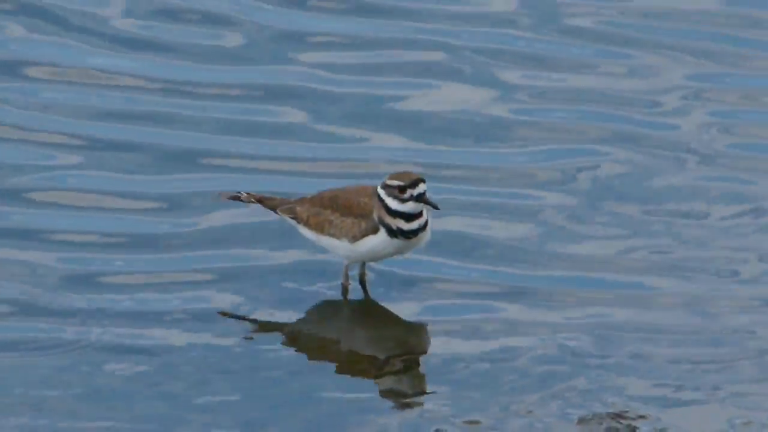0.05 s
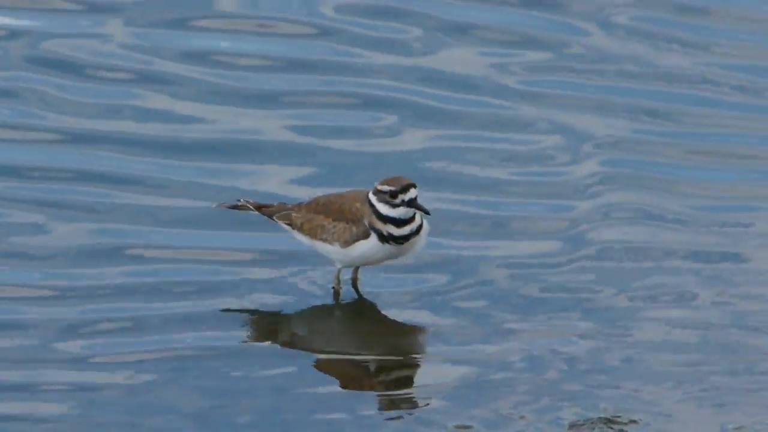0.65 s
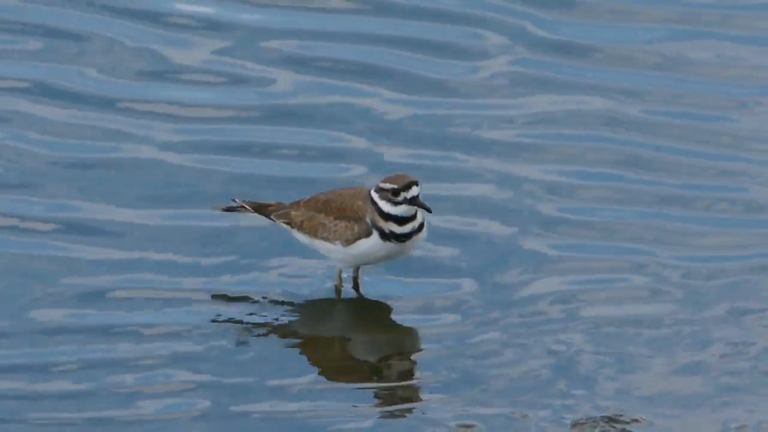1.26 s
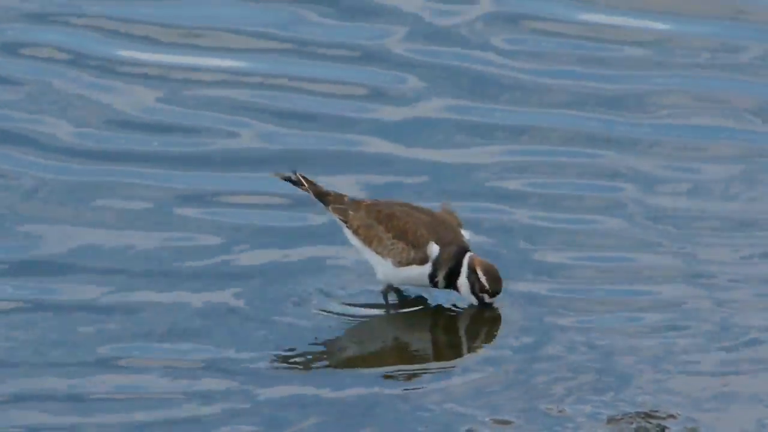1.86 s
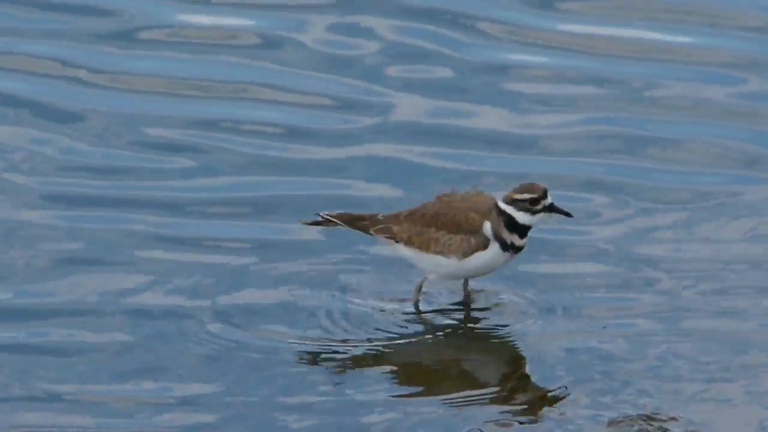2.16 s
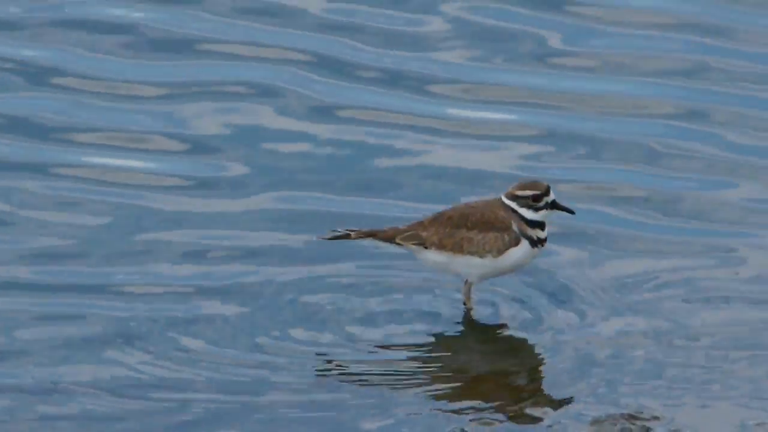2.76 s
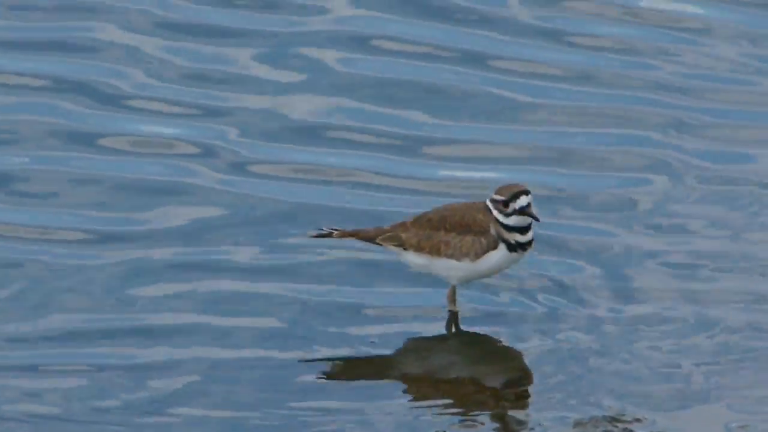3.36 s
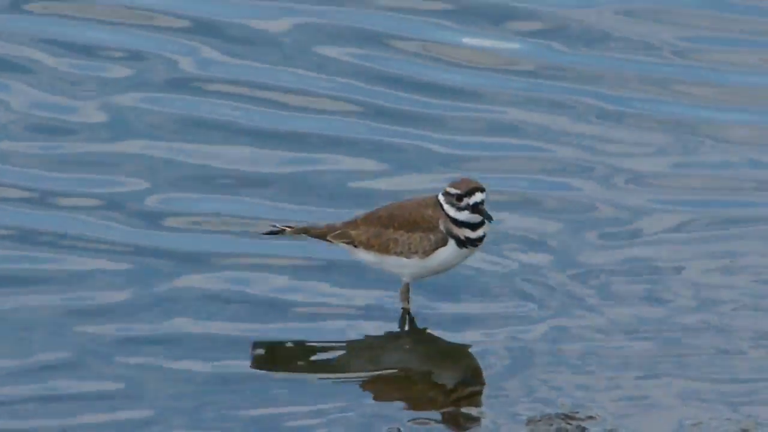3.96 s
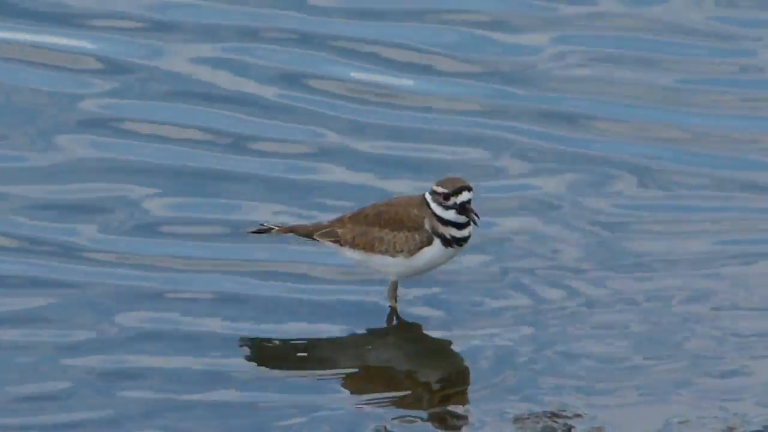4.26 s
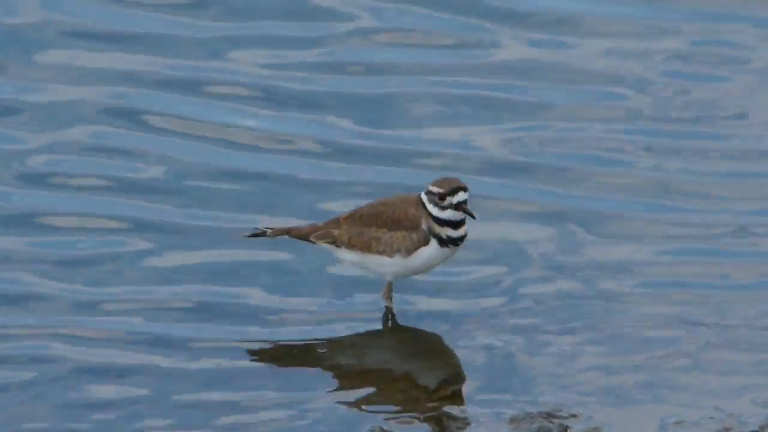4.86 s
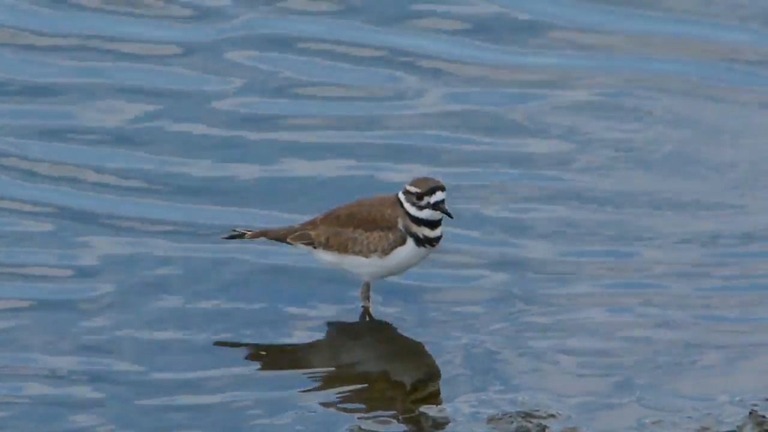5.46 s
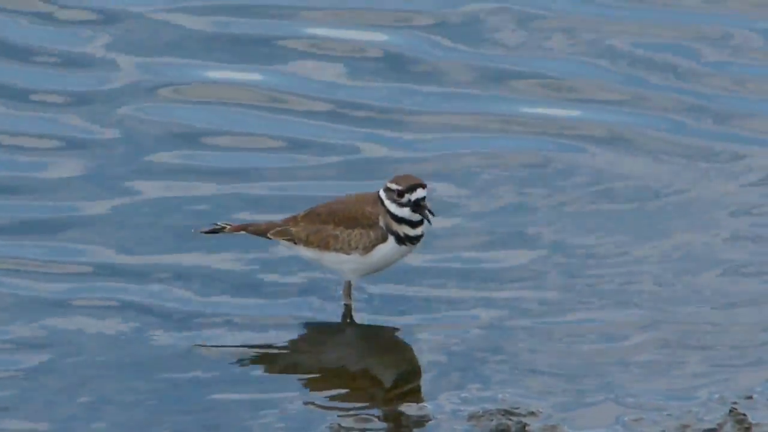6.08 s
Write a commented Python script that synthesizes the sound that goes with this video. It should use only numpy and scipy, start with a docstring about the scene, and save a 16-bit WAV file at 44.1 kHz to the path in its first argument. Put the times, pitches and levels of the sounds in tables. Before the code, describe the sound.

Distant shorebirds chirp, yelp and whistle, mostly from the right, over the quiet wash of shallow water and uneven wind on the microphone. The breeze drops briefly, then returns in harder gusts with low thumps and a few cracks. In the second half, a close shorebird sounds two piercing, slightly rising whistles, the second right at the end. The banks echo the birds faintly.

```python
"""Wind buffets the microphone over the steady wash of an open shore, while shorebirds chip and yelp
and a killdeer whistles far off to the right. After four seconds a near killdeer, standing in shallow
water, gives two loud, drawn-out whistles. Its throat lifts one overtone into the whistle, which turns
hoarse when strained. The banks echo the birds. Gusts hit the microphone's openings (its ports),
and the hardest swirls of air (eddies) thump and crack."""
import sys
import numpy as np
from scipy import signal
from scipy.fft import rfft, irfft, next_fast_len
from scipy.io import wavfile
from scipy.ndimage import uniform_filter1d, minimum_filter1d, map_coordinates

SR = 44100
rng = np.random.default_rng(int(sys.argv[2]) if len(sys.argv) > 2 else 0)


def unload_wav(signal):
    """Save mono or channel-first audio to the path in sys.argv[1] as 16-bit WAV at rate SR, clipped to [-1, 1]."""
    wavfile.write(
        sys.argv[1],
        SR,
        np.round(np.clip(np.atleast_2d(signal).T, -1, 1) * 32767).astype(np.int16),
    )


N = 274302


def amp(db):
    """Turn decibels into a gain."""
    return 10 ** (np.asarray(db) / 20)


def unit(x):
    """Scale x to an average (rms) level of 1."""
    return x / np.sqrt(np.mean(x ** 2) + 1e-20)


def along(points, hz):
    """Read (freq_hz, value) rows at hz, on a log frequency scale."""
    freqs, values = np.transpose(points)
    return np.interp(np.log(hz + 1), np.log(freqs + 1), values)


def bump(t, centre, width):
    """A bell curve of height 1."""
    return np.exp(-((t - centre) / width) ** 2)


def wobble(rate, size=N):
    """A smooth curve through `rate` random values a second."""
    return map_coordinates(rng.standard_normal(int(size * rate / SR) + 4), [np.arange(size) * rate / SR])


def filtered(x, response):
    """Multiply each frequency in x by response(hz)."""
    size = x.shape[-1]
    padded = next_fast_len(size + 4096)
    return irfft(rfft(x, padded) * response(np.fft.rfftfreq(padded, 1 / SR)), padded)[..., :size]


def noise(spectrum, size=N):
    """Two unrelated noises shaped by (freq_hz, gain_db) rows."""
    return unit(filtered(rng.standard_normal((2, size)), lambda hz: amp(along(spectrum, hz))))


def stereo_noise(spectrum, alike):
    """Noise whose left and right are the same (likeness 1), unrelated (0) or opposite (-1)."""
    a, b = noise(spectrum)
    angle = lambda hz: np.arccos(np.clip(along(alike, hz), -1, 1)) / 2
    mid = filtered(a, lambda hz: np.cos(angle(hz)))
    side = filtered(b, lambda hz: np.sin(angle(hz)))
    return unit(np.array([mid + side, mid - side]))


def panned(pan_db):
    """Left and right gains; pan_db is left minus right, so below 0 is to the right."""
    gains = amp(np.array([pan_db, -pan_db]) / 2).reshape(2, -1)
    return gains / np.sqrt(np.mean(gains ** 2, axis=0))


def placed(x, pan_db, lag_ms):
    """Put a sound to one side; the left ear hears it lag_ms later."""
    delay_s = np.array([[lag_ms], [0]]) / 1000
    return panned(pan_db) * filtered(x, lambda hz: np.exp(-2j * np.pi * hz * delay_s))


def add(track, start_s, x):
    """Mix x into track from start_s on."""
    start = max(round(start_s * SR), 0)
    part = x[..., :N - start]
    track[..., start:start + part.shape[-1]] += part


def shore():
    """The steady wash of ripples and distant air, mostly from the right."""
    # tone of the wash: freq_hz, gain_db
    wash = [(25, -12), (50, -13), (100, -1), (180, 0.5), (400, -2.5), (600, -0.5), (950, -2.5),
            (1400, -8.5), (2000, -16.5), (3000, -22), (4800, -24.5), (8000, -32.5), (15500, -40)]
    # how well the ears agree: freq_hz, likeness
    alike = [(200, 0.17), (350, 0.51), (600, 1), (950, 0.9), (1600, 0.79), (3000, 0.31), (9000, 0.31)]
    return amp(-45.5) * placed(stereo_noise(wash, alike), pan_db=-4, lag_ms=0.089)


def wind_strength(rise_s=0.018, fall_s=0.033, sag_db_per_s=3):
    """The wind's level and pan in dB: each gust rises out of the breeze, sags and dies away."""
    # wind between the gusts: time_s, level_db
    breeze = [(0, -47), (.9, -44), (1.55, -49.5), (1.95, -63), (2.8, -59), (3.6, -41), (3.97, -44),
              (4.3, -35.5), (4.9, -38.5), (5.25, -42), (5.6, -36.5), (6.22, -35.5)]
    # gusts at the ports: start_s, length_s, level_db, pan_db
    gusts = [(0.153, .6, -39.5, 3), (1.15, .3, -39.5, -0.5), (1.63, .15, -42, -0.5), (2.483, .23, -48, -2),
             (2.896, 0.0294, -39.5, -1), (3.138, .28, -38, -4), (3.655, .13, -31.5, -6.5),
             (3.843, 0.041, -35.5, -7), (4.022, .16, -32.5, -5), (4.427, .04, -27, -8),
             (4.534, 0.0293, -29, -7.5), (4.626, .06, -26, -2), (4.726, .04, -31, -7.5),
             (4.963, .21, -33, -4.5), (5.306, .09, -29, -0.5), (5.433, .07, -34.5, -5), (5.75, .47, -32, 3)]
    t = np.arange(N) / SR
    power = amp(np.interp(t, *np.transpose(breeze))) ** 2
    side = np.zeros(N)
    for start, length, db, pan_db in gusts:
        edges = np.exp(-np.maximum(start - t, 0) / rise_s - np.maximum(t - start - length, 0) / fall_s)
        gust = (edges * amp(db - sag_db_per_s * np.clip(t - start, 0, length))) ** 2
        power += gust
        side += pan_db * gust
    return 10 * np.log10(power), side / power


def wind(gust_db, side_db, lump_limit_db=5.5):
    """Churning air hits the ports in lumps; stronger gusts break into smaller, brighter eddies."""
    # low rumble of the wind: freq_hz, gain_db
    buffet = [(25, -27), (50, -40), (100, -13.5), (160, -0.5), (240, 3.5), (400, -4), (600, -11),
              (1000, -29), (2000, -36), (5000, -94)]
    # its brighter flutter: freq_hz, gain_db
    flutter = [(100, -81), (250, 4), (400, 2.5), (600, -2.5), (1000, -15.5), (2000, -48.5), (5000, -49),
               (15000, -91)]
    # how well the ports agree: freq_hz, likeness
    alike = [(100, 0.67), (180, 0.3), (300, -0.21), (600, -0.63), (1200, -1.03), (3000, -0.14)]
    lumps_db = 2.82 * wobble(70) + 0.97 * np.array([wobble(110), wobble(110)])
    force_db = gust_db + np.minimum(lumps_db, lump_limit_db)
    low = amp(force_db + 1) * stereo_noise(buffet, alike) * panned(pan_db=-3)
    bright = amp(-35.5 + 1.57 * (force_db + 33.5)) * stereo_noise(flutter, alike) * panned(pan_db=2)
    return panned(side_db) * (low + bright)


def chance_eddies(gust_db, side_db, count, spread_db=1.5):
    """Rows for eddies(): the stronger the wind, the more often and the harder they strike."""
    odds = np.cumsum(amp(gust_db / 2))
    at = np.searchsorted(odds, (np.arange(count) + rng.random(count)) / count * odds[-1])
    size, stray_db = rng.standard_normal((count, 2)).T
    db = gust_db[at] + spread_db * size
    return np.transpose([at / SR, db + 6.5, db - 19, side_db[at] + stray_db])


def eddies(chance_rows, thump_hz=344, thump_s=0.0021, crack_s=0.0013, left_lag_cycles=0.34):
    """An eddy swings the air pressure a few times, out of step at the two ports, and cracks at its peak."""
    # the hardest eddies, levels relative: time_s, thump_db, crack_db, pan_db
    hardest = [(0.165, -24, -67, 8), (0.403, -20, -60, -2), (0.537, -19, -65, 0.5), (0.663, -20.5, -69, -3),
               (1.181, -21, -62, -4), (1.415, -22.5, -44, -9), (2.535, -27, -62, -4),
               (3.01, -26.5, -58, -3), (3.091, -18.5, -51, -10), (3.153, -22.5, -58, -9),
               (3.175, -14.5, -46, -9), (3.279, -19, -58, -2), (3.672, -13, -34.5, -7),
               (3.741, -13, -40.5, -4), (3.782, -16.5, -46, -6), (4.403, -13.5, -38, -9),
               (4.433, -9.5, -30.5, -7), (4.442, -15.5, -44, 10), (4.462, -7, -26.5, 2),
               (4.469, -10, -36.5, 2), (4.478, -6, -21, -3), (4.532, -6.5, -24, -5.5),
               (4.56, -4.5, -36, -5), (4.593, -14.5, -33.5, -3.5), (4.623, -10.5, -58, -13),
               (4.666, -6.5, -39, -8), (4.683, -10, -30, -5), (5.011, -13.5, -31.5, -8.5),
               (5.12, -15.5, -44.5, -6), (5.306, -16, -59, -1), (5.349, -17.5, -39, -8),
               (5.398, -17.5, -48, -12), (5.497, -14, -42.5, 7), (5.775, -14.5, -35, 5),
               (5.966, -16, -34.5, 6), (6.024, -11, -38, 5), (6.1, -10, -38, 6), (6.108, -16.5, -36.5, -2)]
    # tone of a crack: freq_hz, gain_db
    crack_tone = [(200, -31), (600, 15.5), (1200, 8), (2500, -10.5), (5000, -22.5), (9000, -36),
                  (15000, -45)]
    ports = np.zeros((2, N))
    t = np.arange(-1024, 1024) / SR
    treble_octaves = lambda f: np.log2(np.maximum(f / 3300, 1))
    for time_s, thump_db, crack_db, pan_db in [*hardest, *chance_rows]:
        speed = np.exp(0.018 * (thump_db + 14.5))  # harder eddies are smaller and faster
        hz = thump_hz * speed * np.exp(0.24 * wobble(294.3, len(t)))
        phase = 2 * np.pi * (np.cumsum(hz) / SR + rng.random() + np.array([[0], [left_lag_cycles]]))
        thump = panned(pan_db) * np.sin(phase) / np.cosh(speed * t / thump_s)
        spray = 0.15 * rng.standard_normal((2, len(t))) * np.exp(-np.abs(t) / crack_s)
        clicks = (t == 0) + spray  # one sharp click among small ones
        tilt_db = 0.38 * max(crack_db + 25, 0)  # the hardest cracks gain treble
        crack = filtered(clicks, lambda f: 1j * amp(along(crack_tone, f) + tilt_db * treble_octaves(f)))
        crack = placed(crack / np.abs(crack).max(), pan_db, lag_ms=0.3)
        add(ports, time_s + t[0] + 0.0008, amp(thump_db - 2) * thump + amp(crack_db + 15.5) * crack)
    return ports


def ticks(decay_s=0.0005):
    """Tiny bursts of high treble at the ports, among the hardest eddies."""
    # the ticks: time_s, peak_db
    bursts = [(4.458, -40), (4.5322, -38)]
    # tone of a tick: freq_hz, gain_db
    tick_tone = [(3000, -18), (15500, -1)]
    ports = np.zeros((2, N))
    t = np.arange(-256, 256) / SR
    for time_s, db in bursts:
        burst = noise(tick_tone, len(t)) * np.exp(-np.abs(t) / decay_s)
        add(ports, time_s + t[0], amp(db) * burst / np.abs(burst).max())
    return ports


def bank_echo(x, fade_s=0.69, return_s=0.28, return_db=-11):
    """The shores scatter a thin echo across the water; the far bank answers late."""
    t = np.arange(SR) / SR
    scatter = amp(-60 * t / fade_s) * (1 - np.exp(-t / 0.0056))
    far_bank = amp(return_db) * bump(t, return_s, 0.051)
    tail = rng.standard_normal((2, SR)) * (scatter + far_bank)
    return signal.fftconvolve(np.atleast_2d(x), tail / np.linalg.norm(tail[0]), axes=1)[:, :N]


def whistle(rows, jitter, shimmer_db):
    """Slightly unsteady pitch, phase and loudness from (time_s, pitch_hz, level_db) rows."""
    times, hz, db = np.transpose(rows)
    t = np.arange(times[0], times[-1], 1 / SR)
    pitch = uniform_filter1d(np.interp(t, times, hz), size=220, mode="nearest")
    pitch *= 1 + jitter * wobble(253, len(t))
    edges = np.clip(np.minimum(t - t[0], t[-1] - t) / 0.00096, 0, 1)
    envelope = edges * amp(np.interp(t, times, db) + shimmer_db * wobble(69.2, len(t)))
    return pitch, 2 * np.pi * np.cumsum(pitch) / SR, np.sqrt(2) * envelope


def note(rows, octave_db, rough):
    """A small bird's note: a slightly rough tone with a weak octave above it."""
    pitch, phase, envelope = whistle(rows, jitter=0.0071, shimmer_db=1.5)
    grain = 1 + rough * wobble(1270, len(pitch))
    return envelope * grain * (np.sin(phase) + amp(octave_db) * np.sin(2 * phase))


def small_birds(flicker_db=2):
    """Quick arched chips and a thin song; gusty air on the long path makes them flicker."""
    # chips: top_s, length_s, top_hz, fall_share, level_db, pan_db
    chips = [(0.104, 0.035, 5190, 0.16, -63, 13), (1.012, 0.086, 4820, 0.17, -63, 13),
             (1.473, 0.046, 3810, 0.11, -55, -22), (1.865, 0.027, 4650, .12, -65, -4),
             (1.966, 0.037, 4520, 0.24, -69, -5), (2.014, .036, 3800, 0.11, -60, -19),
             (2.475, 0.032, 3920, .09, -57, -17), (3.514, 0.04, 5070, 0.32, -46, 18),
             (4.226, 0.043, 3700, .12, -61, -10), (5.538, 0.041, 5230, 0.28, -51, 24)]
    # the distant song: time_s, pitch_hz, level_db
    song = [(.76, 6350, -71), (.8, 6040, -68), (.862, 6600, -72), (.868, 5900, -76), (.888, 5460, -63),
            (.932, 6200, -68), (.945, 5550, -78), (.98, 6250, -74), (1.045, 6120, -68)]
    voices = np.zeros((2, N))
    u = np.linspace(-0.42, 0.7, num=15)  # time from the top, in chip lengths
    for top_s, length, hz, fall, db, pan_db in chips:
        arch_hz = hz * (1 - fall * (1 - bump(u, 0, 0.53)))
        rows = np.transpose([top_s + u * length, arch_hz, db - 30 * (u - 0.1) ** 2])
        add(voices, rows[0, 0], panned(pan_db) * note(rows, octave_db=-26, rough=0.098))
    add(voices, song[0][0], note(song, octave_db=-35, rough=0.05))
    return voices * amp(-0.5 + flicker_db * wobble(150))


def yelps(droop=0.125, fade_db=12):
    """Each yelp climbs in a low voice, breaks to a higher one and droops ever faster."""
    # yelps: break_s, before_s, after_s, high_hz, low_db, high_db
    breaks = [(0.231, 0.028, 0.051, 3296, -42, -40), (1.079, 0.065, .022, 3530, -51, -58),
              (1.624, .038, 0.042, 3376, -39, -48), (3.395, 0.044, .035, 3290, -41, -46),
              (3.961, .032, 0.057, 3350, -49.5, -45.5), (5.345, .037, 0.041, 3336, -42.5, -40.5)]
    voice = np.zeros(N)
    u = np.linspace(0, 1, num=9)
    for at, before, after, hz, low_db, high_db in breaks:
        low = [(at - before, 0.78 * hz, low_db - 10.5),
               (at - before / 2, 0.842 * hz, low_db - 3),
               (at, 0.872 * hz, low_db),
               (at + 0.0028, 0.88 * hz, low_db - 18)]  # both voices sound at the break
        high = np.transpose([at - 0.001 + after * u, hz * (1 - droop * u**3), high_db - fade_db * u**3])
        for rows in (low, high):
            add(voice, rows[0][0], note(rows, octave_db=-32, rough=0.12))
    return voice


def call(start, length, accent_hz, accent_db, held, waver_hz, waver_db, flick_hz):
    """Rows for whistle(): a high accent falls into the held note, which wavers and flicks down."""
    t = np.arange(0, length, 1 / SR)
    accent = np.exp(-np.abs((t - 0.0143) / 0.017) ** 2.53)
    attack = np.maximum(1 - t / 0.003, 0)
    release = np.maximum(1 - (length - t) / 0.015, 0)
    waver = wobble(18.7, len(t))
    tremor = np.sin(2 * np.pi * 139 * t) * (1 - t / length)  # a fast, fine flutter
    times, hz, db = np.transpose(held)
    held_hz = np.interp(start + t, times, hz) + waver_hz * waver
    held_db = np.interp(start + t, times, db) + waver_db * waver
    hz = (held_hz + (accent_hz - held_hz) * accent - flick_hz * release) * (1 + 0.003 * tremor)
    db = held_db + (accent_db - held_db) * accent - 15 * (attack + release ** 2) + 0.5 * tremor
    db -= 8 * bump(t, 0.0355, 0.002)  # the voice breaks for an instant after the accent
    return np.transpose([start + t, hz, db])


def held_note(start, length, from_hz, to_hz, bow_hz, push_hz, from_db, to_db, sag_db):
    """Rows for a firm held note: it glides up, slackens midway, eases and ends with a push."""
    t = np.arange(0, length, 1 / SR)
    u, remaining_s = t / length, length - t
    sag = bump(u, 0.54, 0.087)
    ease = bump(remaining_s, 0.059, 0.028)
    push = bump(remaining_s, 0.033, 0.024)
    glide_hz = from_hz + (to_hz - from_hz) * u + bow_hz * np.sin(np.pi * u)
    hz = glide_hz - 27 * ease + push_hz * push
    db = from_db + (to_db - from_db) * u - sag_db * sag - 1.5 * ease + 3 * push
    return np.transpose([start + t, hz, db])


def killdeer(calls, rasp, strain_db, hiss_db=-16):
    """The throat lifts the second harmonic into the whistle; near strain_db the voice turns hoarse."""
    # what the throat lets through: freq_hz, gain_db
    throat = [(2300, -21.5), (2650, -32), (4100, 2.5), (5300, -2), (6750, -34), (7050, -19), (7900, -34),
              (9350, -28), (9700, -28), (10500, -22), (11400, -31.5), (13100, -24), (13550, -29),
              (14100, -21.5), (14450, -30), (15700, -32)]
    # hiss of a strained throat: freq_hz, gain_db
    hiss = [(4000, -32), (6000, 0), (15000, -9)]
    voice = np.zeros(N)
    for rows in calls:
        pitch, phase, envelope = whistle(rows, jitter=0.00057, shimmer_db=0.6)
        size = len(pitch)
        catch = 1.5 * bump(np.arange(size) / SR, 0.0075, 0.0039)  # the voice catches as it starts
        hoarse = rasp * (np.minimum(envelope / amp(strain_db), 1) ** 2 + catch)
        phase += hoarse * wobble(900, size)  # uneven cycles smear the top overtones most
        envelope *= 1 + hoarse * wobble(780, size)
        tone = amp(hiss_db) * hoarse * noise(hiss, size)[0]
        for k in range(1, 7):
            drift_db = 1.5 * wobble(14.8, size) + 1.2 * wobble(140, size)  # weak harmonics only
            tone += amp(along(throat, k * pitch / 2) + drift_db * (k != 2)) * np.sin(k * phase / 2)
        add(voice, rows[0, 0], envelope * tone)
    return voice


def far_killdeer():
    """Four wandering whistles, dulled by the long path over the water."""
    # the calls: start_s, length_s, accent_hz, accent_db
    accents = [(0.285, 0.51, 4890, -46.5), (2.283, 0.51, 5000, -41.5), (3.937, .5, 5050, -60),
               (4.706, 0.51, 4910, -50.5)]
    # one held note for each call: time_s, pitch_hz, level_db
    held_notes = [
        [(0.33, 4390, -63), (0.42, 4320, -60.5), (0.486, 4490, -53.5), (0.718, 4320, -51.5), (0.775, 4210, -52)],
        [(2.33, 4350, -60.5), (2.484, 4380, -52), (2.556, 4470, -58), (2.698, 4444, -55.5), (2.765, 4580, -51)],
        [(3.97, 4230, -62), (4.42, 4710, -60)],
        [(4.76, 4431, -65), (4.83, 4480, -58.5), (5.034, 4574, -56), (5.195, 4644, -53)],
    ]
    # tone of the long path: freq_hz, gain_db
    air = [(2200, 9.5), (4000, 3), (5300, 2), (7000, -9), (9000, -8), (12000, -27)]
    calls = [call(*row, held, waver_hz=13.3, waver_db=1, flick_hz=230)
             for row, held in zip(accents, held_notes)]
    return filtered(killdeer(calls, rasp=0.25, strain_db=-36), lambda hz: amp(along(air, hz)))


def near_killdeer():
    """Two loud, firm whistles from close by."""
    # the calls: start_s, length_s, accent_hz, accent_db,
    # then the held note: from_hz, to_hz, bow_hz, push_hz, from_db, to_db, sag_db
    whistles = [(4.005, 0.3854, 5230, -28, 4475, 4747, 56.3, 79, -41.5, -36.5, 0.5),
                (5.783, 0.406, 5290, -24, 4410, 4757, 54.9, 85, -39, -38.5, 5.5)]
    calls = []
    for start, length, hz, db, *shape in whistles:
        held = held_note(start, length, *shape)
        calls.append(call(start, length, hz, db, held, waver_hz=6.8, waver_db=1.1, flick_hz=120))
    return killdeer(calls, rasp=0.12, strain_db=-24)


def scene():
    """Birds at their places over the water, with the shore and the wind."""
    # how far the near bird's wave leads at the left ear (below 0 it trails): freq_hz, lead_radians
    left_lead = [(2300, -0.68), (4700, -0.88), (7000, -0.88), (9400, -0.72), (11800, -0.37), (14200, -.4)]
    near = near_killdeer()
    shifted = filtered(near, lambda hz: np.exp(1j * along(left_lead, hz) * np.array([[1], [0]])))
    far = placed(far_killdeer(), pan_db=-12, lag_ms=0.075)
    yelp = placed(yelps(), pan_db=-13.5, lag_ms=0.073)
    small = small_birds()
    birds = panned(pan_db=0.6) * shifted + far + yelp + small
    # the farther a bird is, the more of it arrives as echo
    echo = bank_echo(amp(-27.5) * near + amp(-23.5) * yelp + amp(-17) * (far + small))
    gust_db, side_db = wind_strength()
    swirls = chance_eddies(gust_db, side_db, count=28)
    gusts = wind(gust_db, side_db) + eddies(swirls)
    return shore() + gusts + ticks() + echo + birds


def limited(x, ceiling_db=-5.5, recovery_db_per_s=9.5):
    """Peaks over the ceiling push the whole sound down at once; the level creeps back."""
    ramp = recovery_db_per_s * np.arange(N) / SR
    excess_db = np.maximum(20 * np.log10(np.abs(x).max(axis=0) + 1e-9) - ceiling_db, 0)
    gain_db = ramp - np.maximum.accumulate(excess_db + ramp)
    return x * amp(uniform_filter1d(minimum_filter1d(gain_db, size=45), size=45))


def record(dry):
    """The level ducks after the hardest blows; the deepest rumble and highest treble are cut."""
    low_hz, top_hz = 58, 15950
    low_cut = signal.butter(3, low_hz, "highpass", fs=SR, output="sos")
    return filtered(signal.sosfilt(low_cut, limited(dry)), lambda hz: hz < top_hz)


dry = scene()
out = record(dry)
unload_wav(out)
```